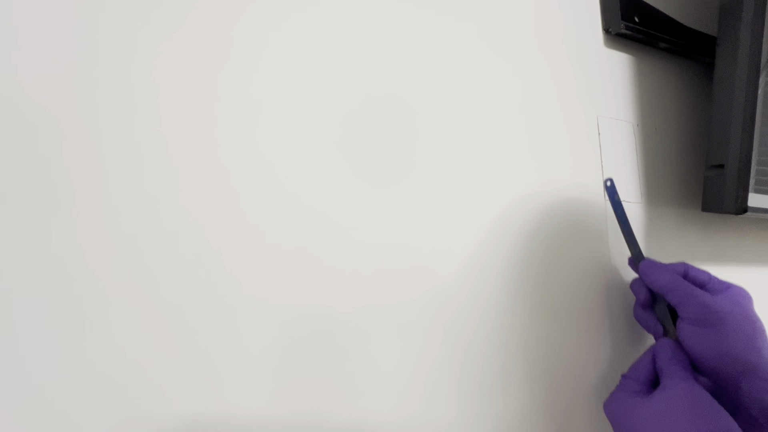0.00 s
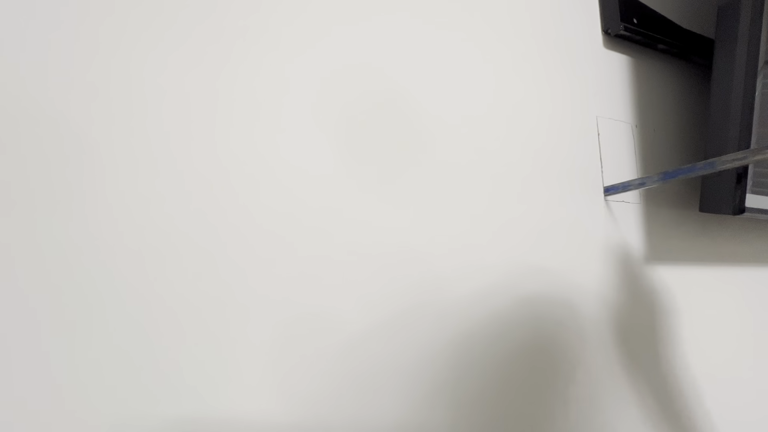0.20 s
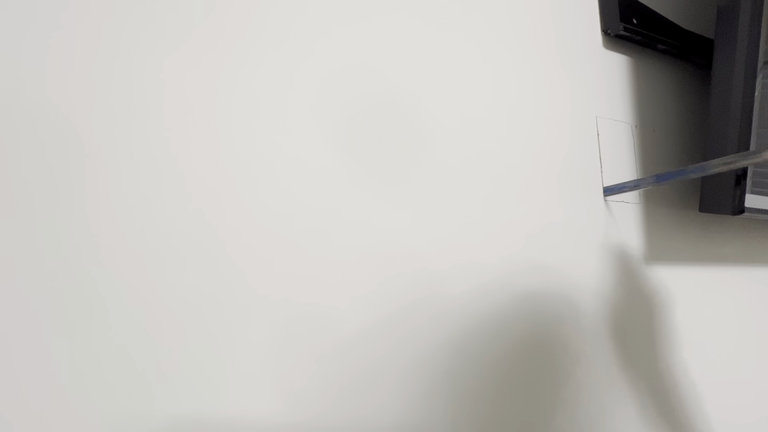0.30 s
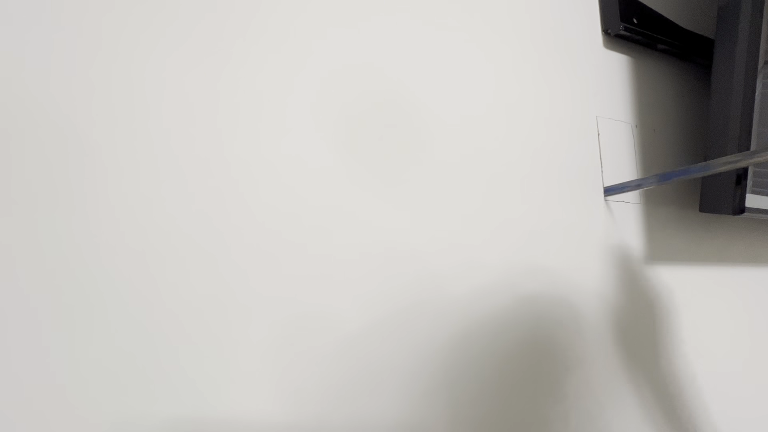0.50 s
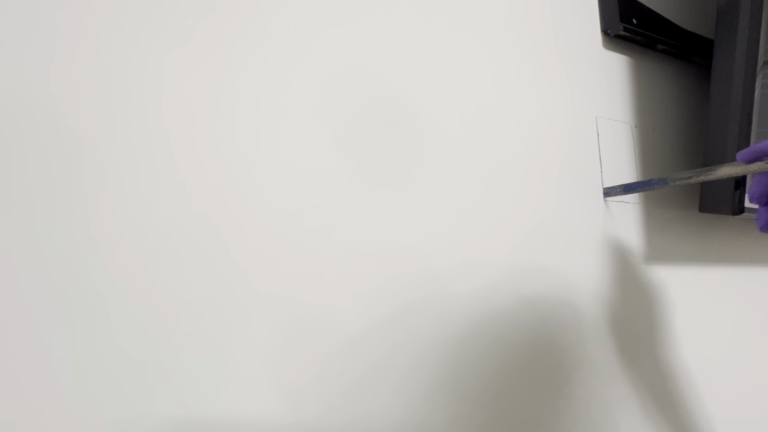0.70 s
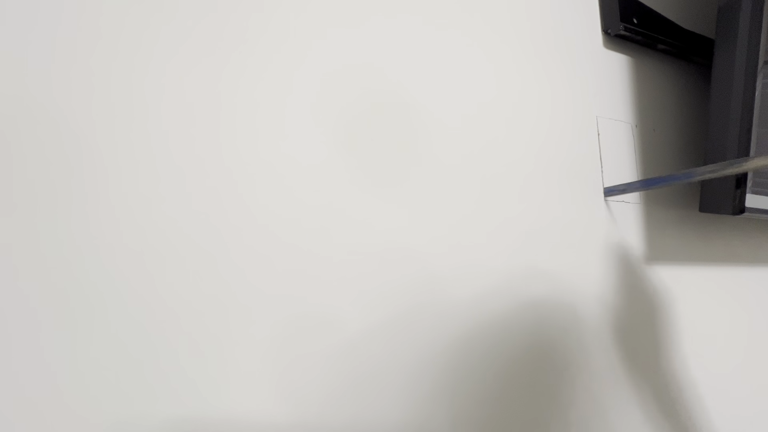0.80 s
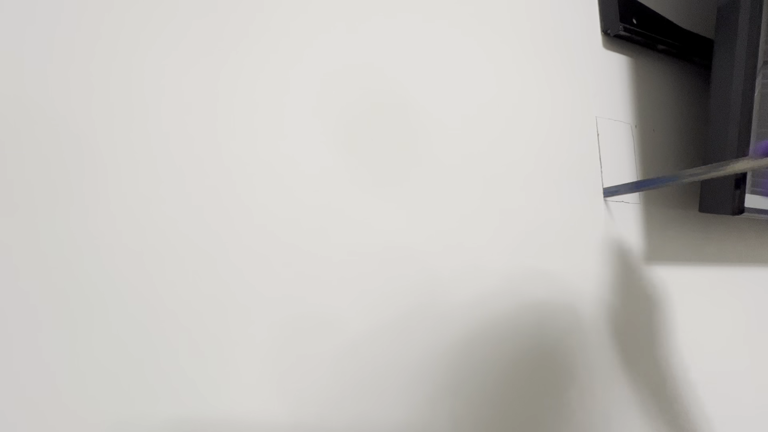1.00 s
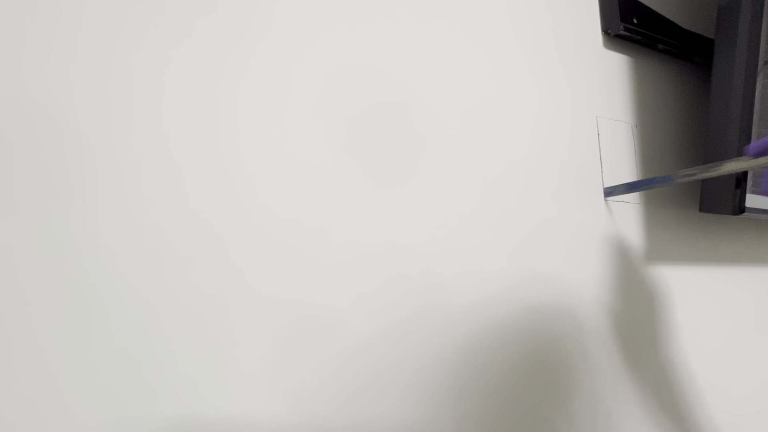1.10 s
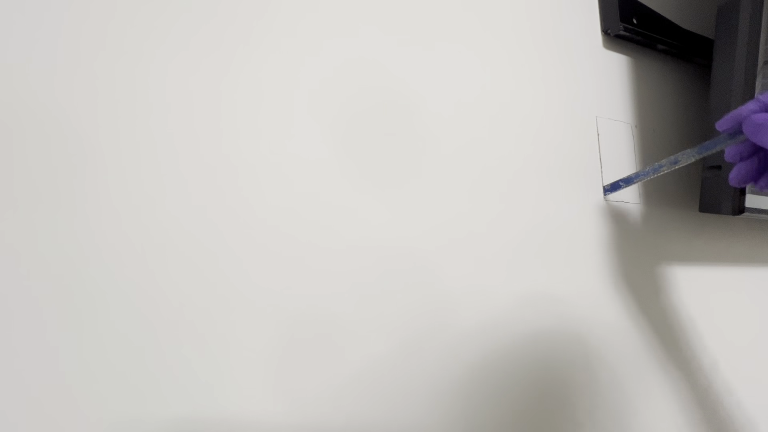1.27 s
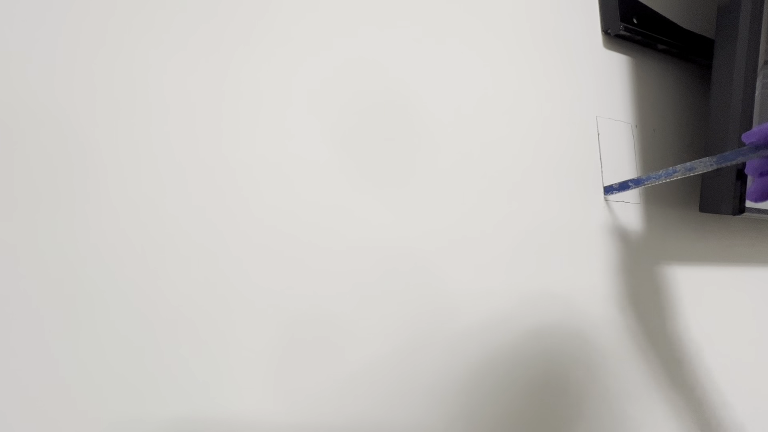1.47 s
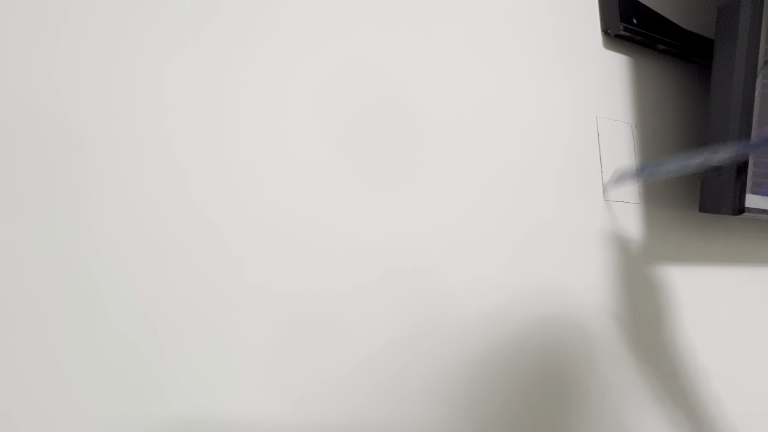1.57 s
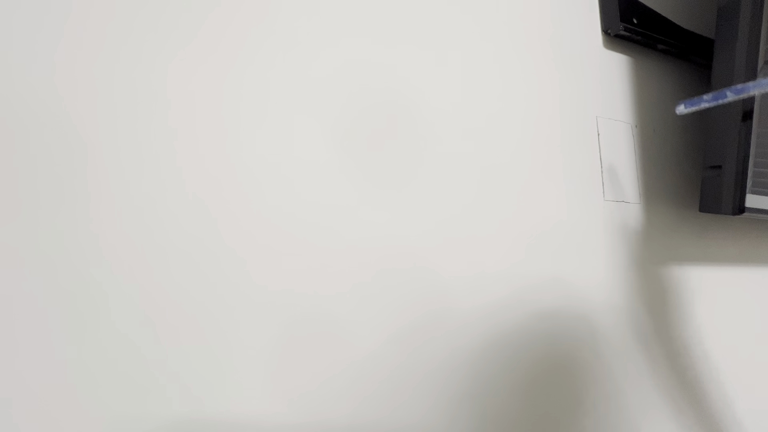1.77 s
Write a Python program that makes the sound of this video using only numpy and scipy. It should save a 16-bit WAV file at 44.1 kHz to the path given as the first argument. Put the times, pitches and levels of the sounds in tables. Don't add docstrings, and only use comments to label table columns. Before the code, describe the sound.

A hand blade saws hollow drywall, close in a small quiet room. Faint scrapes come first, the tip taps at 0.2 s, then rough gritty strokes with knocks run from 0.28 to 1.2 s, loudest near 0.65 and 0.95. The sound stops dead at 1.2 s with a tiny click; short light scrapes and dull taps follow near 1.33 and 1.53, and a very faint scratch at 1.8.

```python
import sys
import numpy as np
from scipy import signal
from scipy.fft import rfft, irfft, next_fast_len
from scipy.io import wavfile
from scipy.ndimage import map_coordinates

SR = 44100
rng = np.random.default_rng(int(sys.argv[2]) if len(sys.argv) > 2 else 0)


def materialize(psi):
    bounded = np.clip(np.atleast_2d(psi).T, -1, 1)
    quanta = np.round(bounded * 32767).astype(np.int16)
    wavfile.write(sys.argv[1], SR, quanta)


def gain_from_db(level_db):
    decades = np.asarray(level_db, float) / 20
    return 10 ** decades


N = 81585
SPAN = next_fast_len(SR)
HZ = np.fft.rfftfreq(SPAN, 1 / SR)

# pitch_hz [Hz], level_db [dB per Hz]
AIR_TONE = [(200, -11), (1000, -18.5), (2000, -6.5), (2800, -15.5), (4600, -29), (6600, -15.5), (9900, -40),
            (13000, -41)]
# pitch_hz [Hz], level_db [dB per Hz]
HUM_TONE = [(12, -33.5), (30, 4.5), (60, 16.5), (91, -5.5), (141, -6), (222, -15.5), (400, -17), (700, -61)]
# pitch_hz [Hz], t60_s [s]
ROOM_DECAY = [(80, 0.87), (200, 0.46), (500, 0.25), (1000, 0.26), (4000, 0.26), (10000, 0.24),
              (15000, 0.17)]
# pitch_hz [Hz], level_db [dB]
ROOM_LEVEL = [(60, -1.5), (300, -2.5), (800, -3), (4000, 2.5)]
# pitch_hz [Hz], level_db [dB]
LEFT_LEAN = [(60, 0), (150, 7), (350, 0.5), (1000, 4), (3000, -0.1), (6000, 1), (9000, -4.5), (13000, -0.5)]
# pitch_hz [Hz], width_hz [Hz], level_db [dB]
PANEL_MODES = [(83.5, 1.9, 11.5), (136.4, 7, 13), (187.4, 10.6, 6), (226.3, 3, 12.5), (336.8, 19, 2.5),
               (416, 7.9, 9.5), (462.5, 16.2, 3.5), (560, 9.7, 12), (621.4, 26, 10.5), (692, 20, 10),
               (751, 33, 5.5), (917, 78, 10.5), (1109.4, 19, 2), (1484, 90, 8)]
# pitch_hz [Hz], level_db [dB]
CRUMB_TONE = [(25, -29.5), (60, -5), (100, -6.5), (200, -5.5), (500, -7), (1000, -16.5), (2500, -32.5),
              (8000, -91.5)]
# pitch_hz [Hz], level_db [dB]
BITE_TONE = [(60, -39.5), (200, 1.5), (400, 2.5), (700, -0.5), (1100, 0), (1500, -6.5), (2500, -15),
             (9000, -100.5)]
# pitch_hz [Hz], level_db [dB per Hz]
GRIT_TONE = [(800, -34), (1500, 3), (2700, -3.5), (4000, -12), (6500, -15), (9000, -22.5), (10500, -26.5),
             (13300, -68)]
# pitch_hz [Hz], width_hz [Hz], level_db [dB]
SIZZLE_MODES = [(15250, 700, -38), (12800, 700, -40), (11700, 600, -33)]
# pitch_hz [Hz], width_hz [Hz], level_db [dB]
BLADE_MODES = [(2730, 50, -0.5), (3920, 39, -5.5), (5270, 100, -6.5), (6290, 120, -1.5), (8240, 300, -6.5),
               (8420, 100, -2), (9400, 80, 4.5)]
# pitch_hz [Hz], level_db [dB]
THUD_TONE = [(80, -34.5), (250, -0.5), (500, -4), (900, -10.5), (1600, -17), (4000, -44.5), (9000, -61.5),
             (12000, -110)]
# start_s [s], level_db [dB], boom_db [dB]
TIP_KNOCKS = [(0.2042, -6, -1), (0.2068, -7.5, -7.5), (0.2092, -10.5, -0.5), (0.281, -13.5, 12.5),
              (0.299, 0.5, -5.5), (0.302, 5, -3.5), (0.309, 3.5, -9), (0.6418, 0.5, -1), (0.672, 0.5, -1),
              (.681, 2.7, -4.2), (.9665, 1.5, -3.5), (0.9691, 1, -7), (.998, -2, -3.5), (1.0988, 0, -10.5),
              (1.334, -23, 18), (1.342, -25.5, 13), (1.372, -18, 5), (1.539, -19.5, 12.5)]
# start_s [s], length_s [s], level_db [dB], grit_db [dB], song_db [dB]
LIGHT_SCRAPES = [
    (-.03, 0.11, -47, 3.5, -8),
    (0.089, 0.16, -43, 1, -11.5),
    (1.326, 0.054, -32, -2, -7.5),
    (1.529, 0.039, -32.5, -3.5, -9.5),
    (1.791, 0.043, -91, 31, -8.5),
]
# start_s [s], length_s [s], level_db [dB], top_tooth_hz [Hz], grit_db [dB]
SAW_STROKES = [
    (0.215, 0.053, -49.5, 303.2, 11.5),
    (0.255, 0.05, -40.5, 140, -1.5),
    (0.281, .062, -31, 481.6, 7),
    (0.417, 0.11, -35, 490, 6.5),
    (0.615, 0.076, -27, 728, 5.5),
    (0.747, 0.11, -31, 583.1, 3),
    (0.936, 0.087, -26.5, 725.3, 4),
    (1.067, 0.11, -37, 470.6, 8),
]
# pitch_hz [Hz], width_hz [Hz], level_db [dB], rumble_db [dB]
BLADE_FLEX = [(397, 61, -2.5, -3.5), (140, 90, 11, 0), (429, 23, 2.5, -1), (332.6, 26, 8, 1.7),
              (668, 210, -8, -2), (580, 125, -4.5, -3.5), (676, 63, -12.5, -1.5), (236.5, 17, 7, 7.9)]
# pitch_hz [Hz], level_db [dB]
TREBLE_BAR = [(8800, -25), (9900, 2), (11500, -5), (13000, -15), (14200, -17), (15000, -13)]

CHANGE_S, FADE_S = 1.2072, 0.0001


def unit(x):
    return x / np.sqrt(np.mean(x ** 2) + 1e-20)


def unit_power(response):
    return response / np.sqrt(np.mean(abs(response) ** 2))


def along(points, hz):
    pitch_hz, value = np.transpose(points)
    return np.interp(np.log(hz + 1), np.log(pitch_hz + 1), value)


def wobble(rate_hz, size=N):
    knots = rng.standard_normal(int(size * rate_hz / SR) + 4)
    return map_coordinates(knots, [np.arange(size) * rate_hz / SR])


def causal(points):
    cepstrum = irfft(np.log(gain_from_db(along(points, HZ)) + 1e-6), SPAN)
    cepstrum[1:SPAN // 2] *= 2
    cepstrum[SPAN // 2 + 1:] = 0
    return np.exp(rfft(cepstrum))


def modes(table):
    total = 0
    for k, (pitch_hz, width_hz, level_db) in enumerate(table):
        damping = 1j * HZ * width_hz
        total = total + (-1) ** k * gain_from_db(level_db) * damping / (pitch_hz ** 2 - HZ ** 2 + damping)
    return total


def noise_layer(points):
    size = next_fast_len(N)
    hz = np.fft.rfftfreq(size, 1 / SR)
    spectrum = rfft(rng.standard_normal((2, size))) * gain_from_db(along(points, hz)) * (hz < 13100)
    return unit(irfft(spectrum, size)[:, :N])


def air():
    whine_hz = 10200
    whine = gain_from_db(-96 + 2.2 * wobble(20)) * np.sin(2 * np.pi * whine_hz * np.arange(N) / SR)
    hiss = gain_from_db(-57.5 + 0.53 * wobble(2.8)) * noise_layer(AIR_TONE)
    hum = gain_from_db(-57 + 2.3 * wobble(1.4)) * noise_layer(HUM_TONE) * gain_from_db([[1.5], [-1.5]])
    return whine + hiss + hum


def room():
    lag_s, shared_hz = 0.00026, 155
    turn_rad, turn_hz = 0.86, 500
    _, t, z = signal.stft(rng.standard_normal((2, SR // 2)), SR, nperseg=256)
    hz = np.fft.rfftfreq(256, 1 / SR)
    decay = gain_from_db(-60 * t / along(ROOM_DECAY, hz)[:, None])
    tail = signal.istft(z * decay, SR, nperseg=256)[1]
    a, b = rfft(tail / np.linalg.norm(tail[0]), SPAN)
    turn = turn_rad * np.exp(-np.log(HZ / turn_hz + 1e-9) ** 2)
    late = np.exp(-2j * np.pi * HZ * lag_s - 1j * turn)
    apart = HZ ** 2 / (HZ ** 2 + shared_hz ** 2)
    right_tail = np.sqrt(1 - apart) * a + np.sqrt(apart) * b
    wet = gain_from_db(along(ROOM_LEVEL, HZ)) * np.array([late * a, right_tail])
    direct = np.array([late, np.ones_like(late)])
    return (direct + wet) * gain_from_db(np.outer([0.5, -0.5], along(LEFT_LEAN, HZ)))


def placed(start_s, spectrum):
    out = np.zeros((2, N + 2 * SPAN))
    first = SPAN + round(start_s * SR)
    out[:, first:first + SPAN] = irfft(spectrum * room(), SPAN)
    return out[:, SPAN:SPAN + N]


def responses():
    panel = 1 + modes(PANEL_MODES)
    body = causal(CRUMB_TONE) * panel
    bite = causal(BITE_TONE) * panel
    grit = causal(GRIT_TONE) + modes(SIZZLE_MODES) * (HZ / 15000) ** 4
    drive = causal([(1000, -16.5), (2500, 9.5), (9000, 3.0), (13200, -49.5), (15000, -2.0)])
    blade = modes(BLADE_MODES) * drive
    return [unit_power(response) for response in (body, bite, grit, blade)]


def knocks(body):
    thud = unit_power(causal(THUD_TONE))
    return [placed(start_s, gain_from_db(level_db) * (thud + gain_from_db(boom_db) * body))
            for start_s, level_db, boom_db in TIP_KNOCKS]


def click(at_s, level_db):
    return gain_from_db(level_db) * (np.arange(N) == round(at_s * SR))


def speed(length_s, rise):
    u = np.clip(np.arange(SR // 5) / SR / length_s, 0, 1)
    arch = u ** rise * (1 - u) ** 0.85
    return arch / arch.max()


def crumbs():
    crumbs_per_s, size_db, chatter_db = 5000, 2, 2.5
    n = SR // 5
    size = gain_from_db(size_db * rng.exponential(size=n)) * rng.standard_normal(n)
    breaks = rng.random(n) < crumbs_per_s / SR
    return unit(size * breaks) * gain_from_db(chatter_db * wobble(88.8, size=n))


def teeth(rate_hz):
    jitter, scatter_db = 0.055, 2.5
    count = np.cumsum(rate_hz) / SR + jitter * wobble(400, size=len(rate_hz))
    strikes = np.diff(np.floor(count), prepend=0) > 0
    blows = strikes * gain_from_db(scatter_db * rng.standard_normal(len(count)))
    return blows * np.sqrt(SR / rate_hz.max())


def stroke(paths, start_s, length_s, level_db, grit_db, tooth_hz=0, song_db=-18, flex=(300, 50, -40, 0)):
    body, bite, grit, blade = paths
    v = speed(length_s, 0.75 if tooth_hz else 0.19)
    force, grind = v ** 0.77, v ** 1.27
    blows = (tooth_hz > 0) * gain_from_db(8) * teeth(tooth_hz * np.sqrt(v) + 1)
    fine = rfft(grind * (crumbs() + 0.27 * blows), SPAN)
    rumble = gain_from_db(flex[3]) * rfft(force * crumbs(), SPAN) * body
    bites = rfft(force * blows, SPAN) * bite
    panel = (rumble + bites) * (1 + modes([flex[:3]]))
    song = gain_from_db(song_db - 7.5) * rfft(grind * crumbs(), SPAN) * blade
    sound = panel + gain_from_db(grit_db) * (gain_from_db(-13.5) * fine * grit + song)
    return placed(start_s, gain_from_db(level_db) * sound)


def scrapes(paths):
    return [stroke(paths, start_s, length_s, level_db, grit_db, song_db=song_db)
            for start_s, length_s, level_db, grit_db, song_db in LIGHT_SCRAPES]


def sawing(paths):
    total = 0
    for (start_s, length_s, level_db, tooth_hz, grit_db), flex in zip(SAW_STROKES, BLADE_FLEX):
        total = total + stroke(paths, start_s, length_s, level_db, grit_db, tooth_hz=tooth_hz, flex=flex)
    return total


def masked(x):
    bar_db, loudness_law, scatter_db = -58, 1.15, 6
    floor_db, floor_hz, top_hz = -110, 13100, 15770
    hz, t, z = signal.stft(x, SR, nperseg=2048)
    loud = np.sqrt(np.mean(np.sum(abs(z) ** 2, axis=1), axis=0)) / 0.05
    bands = rng.standard_normal((40, len(t)))[(hz / 600).astype(int)]
    shape_db = bar_db + along(TREBLE_BAR, hz)[:, None] + scatter_db * bands
    bar = 0.05 * loud ** loudness_law * gain_from_db(shape_db)
    bar = bar + gain_from_db(floor_db) * (hz > floor_hz)[:, None]
    heard = (abs(z).max(axis=0) > bar) & (hz < top_hz)[:, None]
    return signal.istft(z * heard, SR, nperseg=2048)[1][:, :N]


def scene():
    paths = responses()
    light, taps = scrapes(paths), knocks(paths[0])
    before = sawing(paths) + sum(taps[:14]) + sum(light[:2])
    after = sum(light[2:]) + sum(taps[14:])
    gate = np.clip((CHANGE_S - np.arange(N) / SR) / FADE_S, 0, 1)
    snap = click(CHANGE_S - FADE_S, -50)
    first_tick = click(0.2030, -52)
    return masked(before * gate + after + air()) + snap + first_tick


def roll_off(x):
    return signal.sosfilt(signal.butter(12, 15790, fs=SR, output="sos"), x)


def record(dry):
    return roll_off(dry)


dry = scene()
out = record(dry)
materialize(out)
```